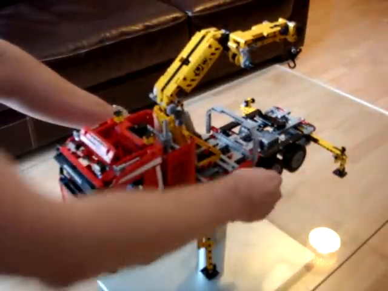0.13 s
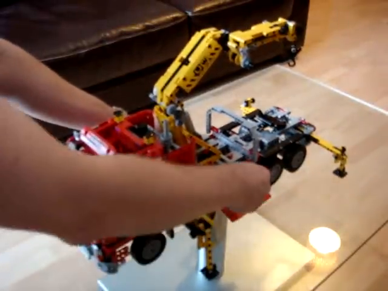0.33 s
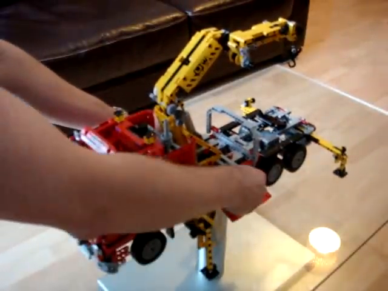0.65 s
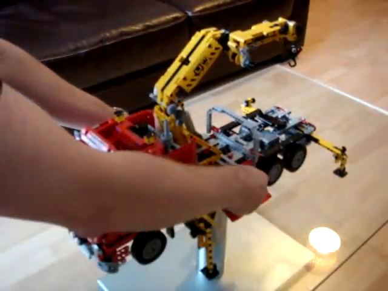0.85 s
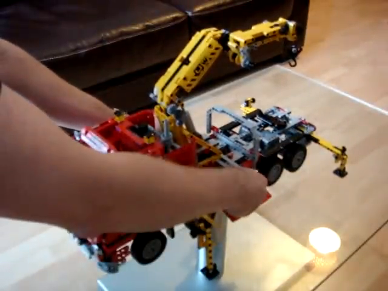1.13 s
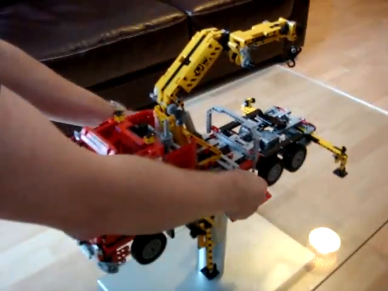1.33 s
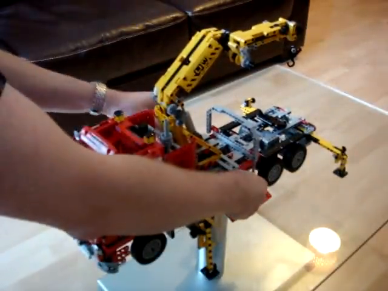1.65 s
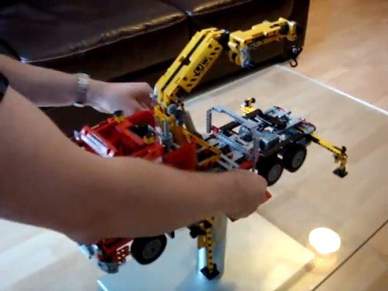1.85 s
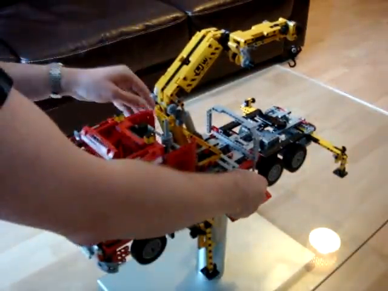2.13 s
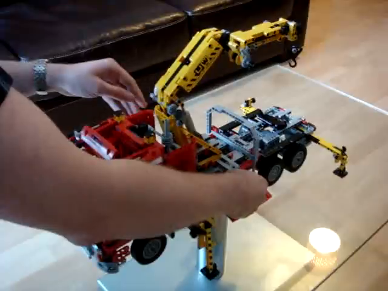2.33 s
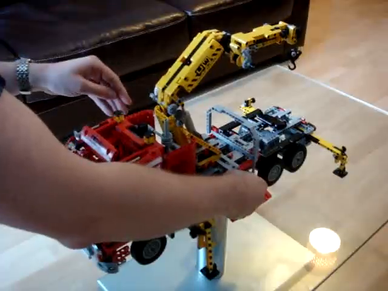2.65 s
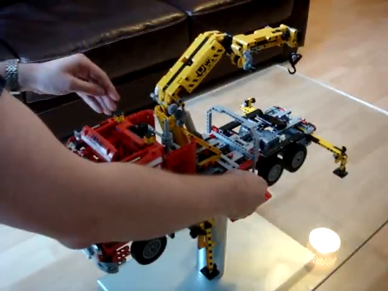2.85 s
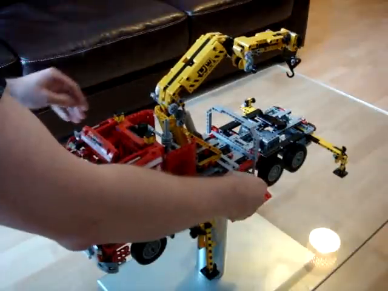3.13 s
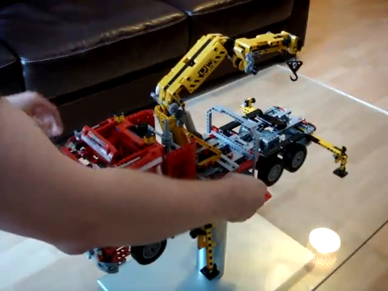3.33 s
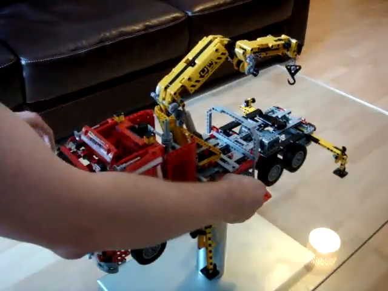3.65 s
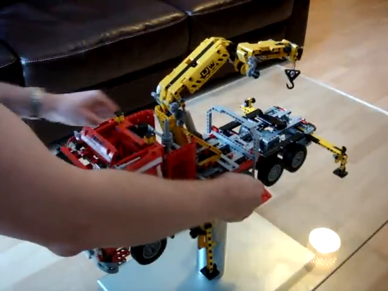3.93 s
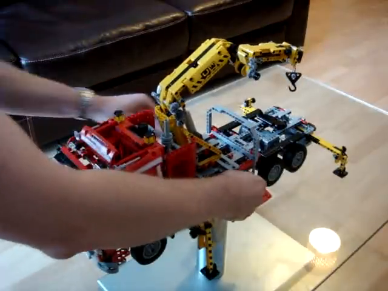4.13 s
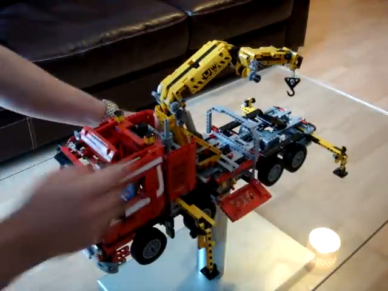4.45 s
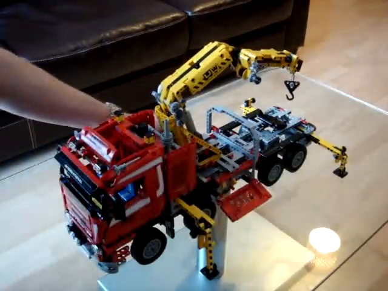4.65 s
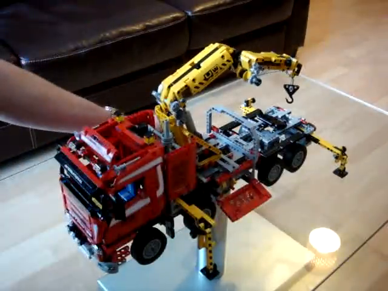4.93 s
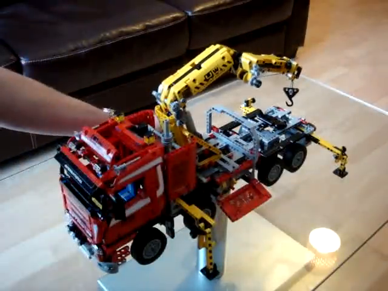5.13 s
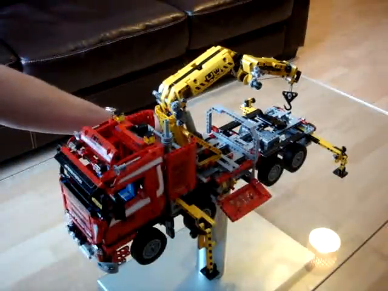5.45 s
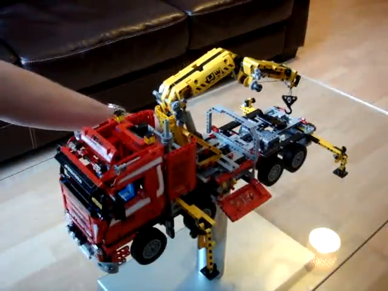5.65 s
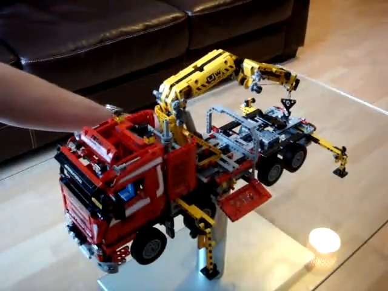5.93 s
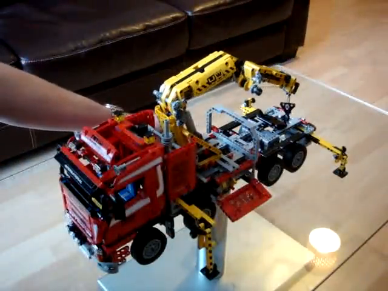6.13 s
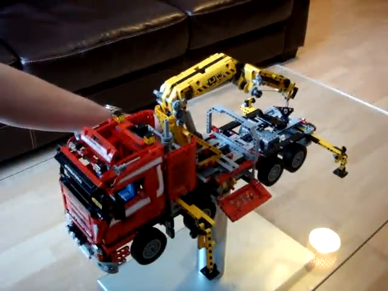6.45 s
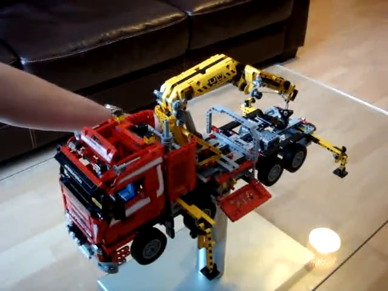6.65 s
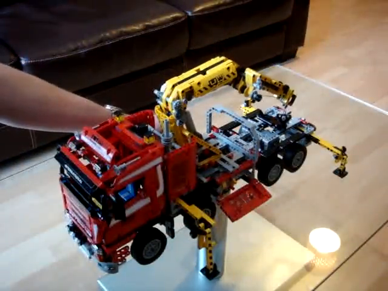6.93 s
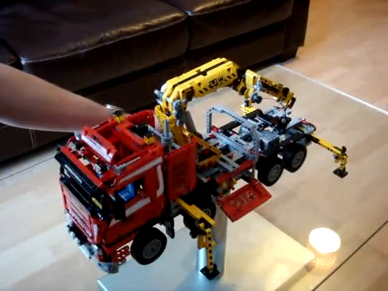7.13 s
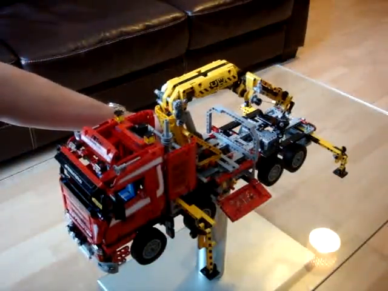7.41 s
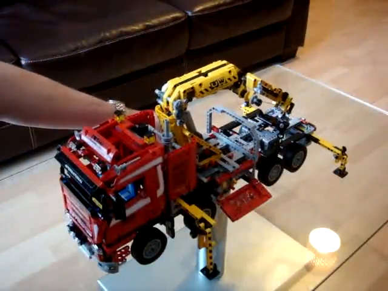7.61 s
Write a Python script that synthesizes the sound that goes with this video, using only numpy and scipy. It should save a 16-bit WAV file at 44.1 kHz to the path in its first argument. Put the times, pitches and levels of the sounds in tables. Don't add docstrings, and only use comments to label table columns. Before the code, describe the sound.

Indoors, cloth brushes softly and fingers lightly tap plastic over faint hiss. About a second in, a small electric motor spins up, whining nasally through rattling plastic gears. Its pitch lifts briefly about twice a second as the load slips. Later it labours slightly lower, two close knocks sound, and it winds down at the end. Close, narrow mono camera microphone.

```python
import sys
import numpy as np
from scipy import signal
from scipy.fft import rfft, irfft, next_fast_len
from scipy.io import wavfile
from scipy.ndimage import uniform_filter1d

SR = 44100
rng = np.random.default_rng(int(sys.argv[2]) if len(sys.argv) > 2 else 0)


def invert_db(x):
    u = np.asarray(x, float) / 20
    return 10 ** u


def wav_record(signal):
    frames = np.transpose(np.atleast_2d(signal))
    bounded = np.clip(frames, -1, 1)
    quanta = np.round(bounded * 32767).astype(np.int16)
    wavfile.write(sys.argv[1], SR, quanta)


N = 343098


def evened(x):
    return x / np.sqrt(np.mean(x ** 2) + 1e-20)


def along(rows, off):
    s, *columns = np.transpose(rows)
    return [np.interp(np.arange(N) / SR, s, c, off, off) for c in columns]


def coloured(x, points, bumps=()):
    f, db = np.transpose(points)
    size = next_fast_len(N)
    hz = np.fft.rfftfreq(size, 1 / SR)
    shape_db = np.interp(np.log(hz + 1), np.log(f + 1), db)
    for centre, width, bump_db in bumps:
        shape_db += bump_db * np.exp(-((hz - centre) / width) ** 2)
    return evened(irfft(rfft(x, size) * invert_db(shape_db), size)[:N])


def band(x, low_hz, high_hz):
    return signal.sosfiltfilt(signal.butter(3, (low_hz, high_hz), "band", fs=SR, output="sos"), x)


def drift(hz):
    return evened(signal.lfilter(*signal.butter(2, hz, fs=SR), rng.standard_normal(N)))


def resonate(x, hz, width_hz):
    r = np.exp(-np.pi * width_hz / SR)
    return 2 * signal.lfilter([1 - r], [1, -r * np.exp(2j * np.pi * hz / SR)], x).real


def patchy(x, patch_db):
    z = signal.stft(x, nperseg=256)[2]
    field = uniform_filter1d(rng.standard_normal(z.shape), size=3, axis=0)
    field = evened(uniform_filter1d(field, size=12, axis=1))
    return signal.istft(z * invert_db(patch_db * field), nperseg=256)[1][:N]


TEETH = 10
LIGHT_HZ, HEAVY_HZ = 1221.4, 1170
LOADED_S, LOADING_S = 2.6, 0.04
ON_S, SPIN_UP_S, OFF_S, COAST_S, COAST_EASE_S = 0.94, 0.075, 7.45, 0.29, 0.07
# start_s, speed_lift_hz, bite_db (tooth bite in that turn)
GEAR_TURNS = [(0.9, 0.1, -0.5), (1.354, 42, 2.3), (1.812, 47, 0.8), (2.241, 38, -1.6), (2.70, 38.6, 1.3),
              (3.23, 40, 0.1), (3.69, 42, 2), (4.156, 40.5, -0.5), (4.611, 42, 1.3), (5.07, 38, -0.2),
              (5.535, 34, 0.1), (6.0, 38.3, 1.2), (6.456, 42, 2), (6.914, 40, 2), (7.37, 0.1, 1.5)]
# after_s, speed_lift_share, contact_lost_share
SLACK_COURSE = [
    (0.0, 0.01, 0.01),
    (0.02, 0.25, 0.9),
    (0.05, 0.95, 0.99),
    (0.11, 0.97, 0.8),
    (0.15, 0.85, -0.17),
    (0.185, 0.12, 0.01),
    (0.24, -0.42, -0.03),
    (0.31, -0.05, 0.05),
    (0.42, 0.01, -0.085),
]


def drive():
    t = np.arange(N) / SR
    starts, lift_hz, bite_db = np.transpose(GEAR_TURNS)
    turn = np.maximum(np.searchsorted(starts, t) - 1, 0)
    after, *shares = np.transpose(SLACK_COURSE)
    slack, loose = (np.interp(t - starts[turn], after, share) for share in shares)
    heavy = 0.5 + 0.5 * np.tanh((t - LOADED_S) / LOADING_S)
    pull = np.exp(-np.maximum(t - ON_S, 0) / SPIN_UP_S)
    coast = uniform_filter1d(np.exp(-np.maximum(t - OFF_S, 0) / COAST_S), int(COAST_EASE_S * SR))
    running_hz = LIGHT_HZ + (HEAVY_HZ - LIGHT_HZ) * heavy + lift_hz[turn] * slack
    mesh_hz = running_hz * (1 - pull) * coast
    return mesh_hz, slack, loose, bite_db[turn], heavy, pull, 1 - coast


# centre_hz, half_width_hz, lift_db
CASE_RESONANCES = [(833, 24, 3.5), (1190, 120, 2.5), (1870, 120, 2.5), (2050, 257, 6.5), (2321, 50, 11),
                   (2430, 50, 10), (3300, 150, 9), (3511, 58, 16), (3690, 70, 12), (3777, 55, 19),
                   (4628, 82, 11)]


def case_db(hz):
    return sum(db * np.exp(-((hz - centre) / width) ** 2) for centre, width, db in CASE_RESONANCES)


FULL_DB = -35.5
SHAFT_DB, SHAFT_LIGHT_DB, SHAFT_SLACK_DB = -62, -2.5, 1.2
MESH_WANDER_DB, FLUTTER_DB = 1.3, 2.5
SPEED_JITTER, COAST_JITTER = 0.0022, 0.025
# time_s, level_db
MOTOR_EFFORT = [(0.96, -77), (1.0, -48), (1.03, -40), (1.11, -37), (1.3, -37.5), (1.99, -36.5),
                (2.3, -36.5), (2.9, -36), (4.2, -35.5), (5.06, -35.5), (7.13, -35.5), (7.42, -35.5),
                (7.59, -37), (7.78, -58)]
# multiple, off_resonance_db, no_contact_db, pull_away_db, coasting_db
MESH_HARMONICS = [(1, -62, -1.5, 18, -14), (2, -59.5, -6.5, 17, 6), (3, -61.5, -10, 20, 16),
                  (4, -69, -6, 18, 25)]
# turns_multiple, level_db
SHAFT_ORDERS = [(1, -26), (3, -10), (4, -13), (6, -4.5), (7, 0), (9, -6)]
# turns_multiple, level_db
UPPER_ORDERS = [(13, -20), (23, -18), (27, -15), (27.5, -13), (36.5, -15), (39.5, -15), (50, -18),
                (59.5, -11), (70, -13)]
TOOTH_ROUGHNESS = (.5, .45, .9)
# pitch_hz, width_hz, level_db
SINGING_BEAMS = [(840, 12, -17.5), (3544, 32, -4.5)]


def whine():
    mesh_hz, slack, loose, bite_db, heavy, pull, coasting = drive()
    coasting_root = np.sqrt(abs(coasting))
    effort_db = 1.76 * (along(MOTOR_EFFORT, -120)[0] - FULL_DB)
    mesh_db = []
    for k, db, loose_db, pull_db, coast_db in MESH_HARMONICS:
        level_db = db + effort_db + bite_db + loose_db * loose + pull_db * np.sqrt(pull)
        level_db = level_db + coast_db * coasting_root + MESH_WANDER_DB * drift(6.8)
        mesh_db.append(level_db + case_db(k * mesh_hz))
    first_db, second_db, third_db, fourth_db = mesh_db
    shaft_db = SHAFT_DB + effort_db + SHAFT_SLACK_DB * slack + SHAFT_LIGHT_DB * (1 - heavy)
    shaft_db = shaft_db + 1.1 * drift(6.7) - 25 * np.sqrt(np.clip(1 - mesh_hz / HEAVY_HZ, 0, 1))

    jitter = (SPEED_JITTER + COAST_JITTER * coasting_root) * drift(32.5)
    turns = np.cumsum(mesh_hz * (1 + jitter)) / SR / TEETH
    orders = []
    for k, db in SHAFT_ORDERS:
        lift_db = case_db(k * mesh_hz / TEETH) if k == 7 else 3.1
        orders.append((k, shaft_db + db - 3.0 + lift_db))
    orders += [(k, second_db + db + 3.0) for k, db in UPPER_ORDERS]
    flutter = drift(35)
    tones = np.zeros(N)
    for n, (k, db) in enumerate(orders):
        own_flutter_db = FLUTTER_DB * np.roll(flutter, 9973 * n)
        tones += invert_db(db + 3.0 + own_flutter_db) * np.sin(2 * np.pi * k * turns + n)

    strain_db = 3.5 * np.clip((1150 - mesh_hz) / 100, 0, 1)
    upper_db = (second_db + strain_db, third_db, fourth_db)
    for k, db, rough in zip((2, 3, 4), upper_db, TOOTH_ROUGHNESS):
        uneven = 1 + rough * (drift(60) + 1j * drift(60)) / np.sqrt(2)
        tones += invert_db(db + 2.0) * (uneven * np.exp(2j * np.pi * k * TEETH * turns)).real
    chop = 0.24 + np.cos(np.pi * turns / 2 + 2.02 * drift(5.5))
    tones += invert_db(first_db + 7.0 + 1.3 * drift(40)) * chop * np.sin(2 * np.pi * TEETH * turns)
    singing = sum(invert_db(db) * resonate(tones, hz, width) for hz, width, db in SINGING_BEAMS)
    return tones + singing, turns


SLACK_RATTLE_DB = -0.28
TREBLE_DB, TREBLE_SLOW_DB, GROWL_DB, GROWL_SLOW_DB = -2, -14, -12, 6.5
# freq_hz, density_db_per_hz
FRAME_SLOPE = [(110, -62.5), (150, -45), (355, -31.5), (700, -17.5), (1000, -13.5), (1400, -11), (2000, -6),
               (2870, -11), (4300, -12), (5300, -11), (6300, -8.5), (7800, -10), (9980, -10.5),
               (13000, -23)]
# centre_hz, half_width_hz, lift_db
PANEL_RESONANCES = [(1156, 30, 5.5), (2310, 140, 3.5), (3700, 530, 9), (4380, 80, 2.5), (5670, 110, 1.5),
                    (6837, 290, 7), (7275, 294, 9), (8690, 410, 4), (9360, 110, 2.5)]
BEAM_HZ = [375, 840, 1126, 1177, 1502, 1842, 2060, 2416, 3300, 3705, 3972, 4235, 4632, 5819, 6606, 6908,
           8258]
# width_hz, level_db
BEAM_RINGS = [(14, -35.5), (14, -36.5), (19, -26.5), (16, -30), (14, -41), (30, -26), (22, -23.5),
              (25, -31), (30, -30.5), (29, -21.5), (30, -22.5), (30, -25.5), (22, -34.5), (39.7, -30),
              (16, -21.5), (39, -24), (16, -15.5)]


def rattle(turns):
    mesh_hz, _, loose, *_ = drive()
    slowed = np.clip(1 - mesh_hz / HEAVY_HZ, 0, 1)
    level_db = along(MOTOR_EFFORT, -120)[0] + SLACK_RATTLE_DB * loose
    treble_db = TREBLE_DB + TREBLE_SLOW_DB * slowed
    growl_db = GROWL_DB + GROWL_SLOW_DB * slowed
    knocks = rng.standard_normal(N) * invert_db(0.85 * rng.exponential(1, N).clip(0, 4))
    knocks *= 1 + 0.06 * np.cos(2 * np.pi * turns) + 0.017 * np.cos(np.pi * turns)
    knocks = evened(knocks * invert_db(0.4 * drift(17) + 0.34 * drift(170)))

    body = coloured(knocks, FRAME_SLOPE, PANEL_RESONANCES)
    beams = np.zeros(N)
    for hz, (width, db) in zip(BEAM_HZ, BEAM_RINGS):
        beams += invert_db(db) * evened(resonate(knocks, hz, width))
    body = evened(body + beams)
    slow = 1 - np.clip(np.gradient(turns) * SR * TEETH / 1150, 0, 1) ** 4
    body = body - slow * band(body, 990, 1230) + (invert_db(growl_db + 12) - 1) * band(body, 1400, 2250)
    body = body + (invert_db(treble_db + 4.0) - 1) * band(body, 4970, 15000)
    return patchy(invert_db(level_db - 0.95) * body, patch_db=0.5)


THRUM_S, TABLE_REST_DB, TABLE_HIGH_DB, TABLE_START_S = 0.062, -73.5, -67, 1.24
TABLE_TONES = (198.5, 453)
# centre_s, level_db
TABLE_THRUMS = [(1.5, -70), (2.02, -64), (2.49, -66), (2.85, -68), (3.2, -78), (3.62, -73), (3.83, -72),
                (4.36, -77), (4.72, -72), (5.04, -72), (5.35, -67), (5.62, -70), (5.82, -71), (6.22, -70),
                (6.9, -68.5), (7.2, -75), (7.46, -71)]


def table():
    t = np.arange(N) / SR
    started = np.clip((t - TABLE_START_S) / 0.2, 0, 1)
    low = invert_db(TABLE_REST_DB) + sum(invert_db(db) * np.exp(-((t - s) / THRUM_S) ** 2) for s, db in TABLE_THRUMS)
    high = invert_db(TABLE_HIGH_DB + 2.2 * drift(3.2))
    tones = [size * np.sin(2 * np.pi * hz * t + drift(2.8)) for size, hz in zip((low, high), TABLE_TONES)]
    return started * sum(tones)


# time_s, level_db
SLEEVE_BRUSH = [
    (0.0, -54),
    (0.128, -54),
    (0.234, -57.5),
    (0.242, -56),
    (0.248, -60),
    (0.284, -62),
    (0.314, -62),
    (0.4, -85),
]
# freq_hz, density_db_per_hz
CLOTH_COLOUR = [(120, -52), (200, -31), (385, -14), (468, -16.5), (693, -11.5), (1060, -18.5), (1170, -16),
                (5360, -19), (9980, -27), (13000, -60), (22000, -120)]
# start_s, peak_db, pitch_hz
FINGER_TAPS = [
    (0.115, -46, 662),
    (0.227, -53, 864),
    (0.417, -47.5, 790),
    (5.137, -37, 573),
    (5.156, -42, 640),
]


def hands():
    cloth = coloured(rng.standard_normal(N), CLOTH_COLOUR)
    out = invert_db(along(SLEEVE_BRUSH, -120)[0] + drift(60)) * cloth
    t = np.arange(2000) / SR
    for s, db, hz in FINGER_TAPS:
        rings = np.sin(2 * np.pi * hz * t) + 1.1 * np.sin(2 * np.pi * 1.4 * hz * t)
        rings += 0.33 * np.sin(2 * np.pi * 0.48 * hz * t)
        decay = invert_db(db - 60 * t / 0.057)
        out[round(s * SR):][:len(t)] += 1.2 * decay * rings * (1 - np.exp(-t / 0.007))
    return out


def room(x):
    taps = np.zeros(SR // 3)
    at = np.arange(120, len(taps) - 22, 22)
    at = at + rng.integers(0, 22, len(at))
    taps[at] = rng.choice([-1., 1.], len(at)) * invert_db(-60 * at / SR / 0.33)
    return signal.fftconvolve(x, taps / np.linalg.norm(taps))[:N]


HUM_HZ, HUM_DB, FIELD_HZ, HISS_DB = 100.0, -76, 59.94, -55.5
# freq_hz, density_db_per_hz
HISS_COLOUR = [(15, -58), (25, -21.5), (92, -10.5), (168, -7.5), (205, -1.5), (238, -3), (394, 0),
               (481, 2.5), (545, 1), (701, -0.5), (1130, -1.5), (1490, -3.5), (9980, -9.5), (13000, -57),
               (22000, -120)]


def camera():
    t = np.arange(N) / SR
    field = (t - 0.0098) * FIELD_HZ
    gate = np.exp(-(field % 1) / FIELD_HZ / 0.00046) * (1 - 0.15 * (field // 1 % 2))
    ticks = evened(band(gate * (1.8 + rng.standard_normal(N)), 3800, 7000))
    hum = invert_db(HUM_DB + 1) * np.sin(2 * np.pi * HUM_HZ * t)
    hiss = invert_db(HISS_DB - 1.17) * coloured(rng.standard_normal(N), HISS_COLOUR)
    return hiss + invert_db(-67.0) * ticks + hum


def scene():
    tones, turns = whine()
    near = tones + hands()
    mono = near + invert_db(-8.0) * room(near) + rattle(turns) + table() + camera()
    return np.tile(mono, (2, 1))


def starved(x, under_db):
    hz, _, z = signal.stft(x, SR, nperseg=256, noverlap=192)
    rows, columns = np.arange(0, z.shape[0], 3), np.arange(0, z.shape[1], 4)
    row_hz = hz[rows, None]
    power = np.add.reduceat(np.add.reduceat(abs(z) ** 2, rows, 0), columns, 1)
    around = np.exp(uniform_filter1d(np.log(power + 1e-20), size=11, axis=1))
    around *= np.where((row_hz < 6500) | (row_hz > 9400), 1.25, 1)
    kept = (power > around * invert_db(2 * under_db)) | (row_hz < 4900)
    kept = np.repeat(np.repeat(kept, 3, 0)[:z.shape[0]], 4, 1)[:, :z.shape[1]]
    return signal.istft(z * np.maximum(kept, 0.03), SR, nperseg=256, noverlap=192)[1][:N]


def low_pass(x):
    return signal.sosfilt(signal.butter(12, 10130, fs=SR, output="sos"), x)


def record(dry):
    mono = starved(dry[0], under_db=-3.7)
    edge = signal.firwin(601, 10050, window=("kaiser", 9), fs=SR)
    mono = signal.oaconvolve(mono, edge, "same")
    return low_pass(np.tile(mono, (2, 1)))


dry = scene()
out = record(dry)
wav_record(out)
```